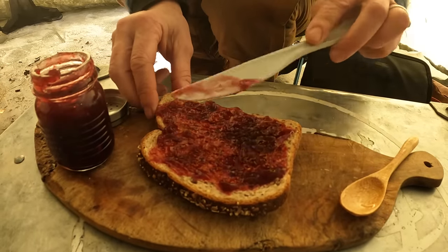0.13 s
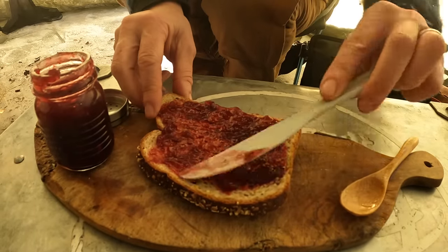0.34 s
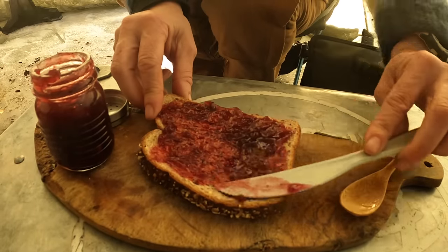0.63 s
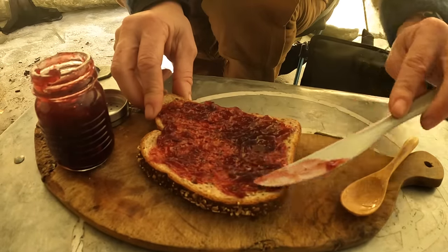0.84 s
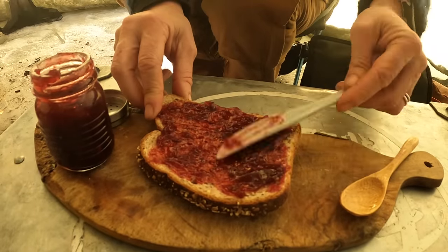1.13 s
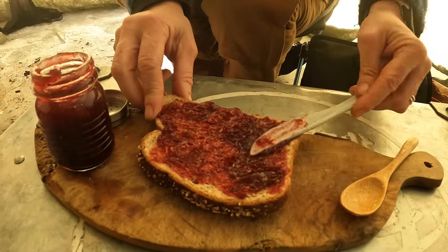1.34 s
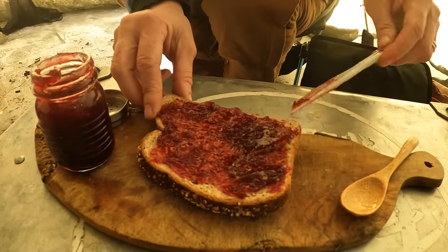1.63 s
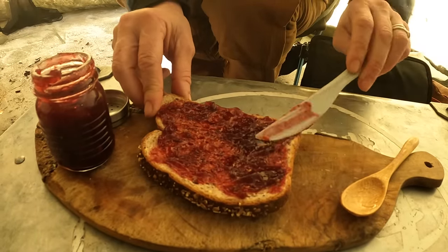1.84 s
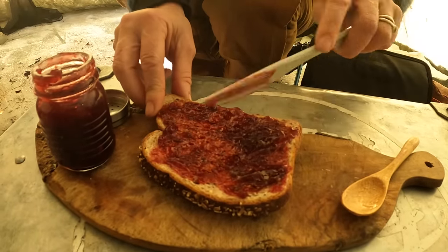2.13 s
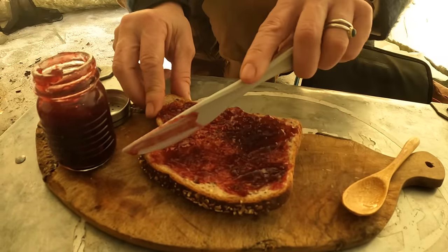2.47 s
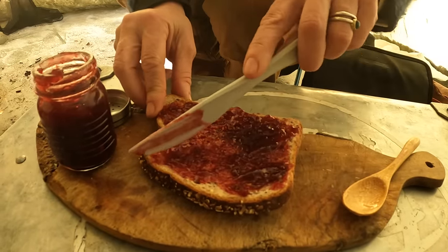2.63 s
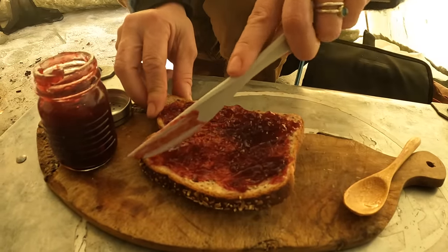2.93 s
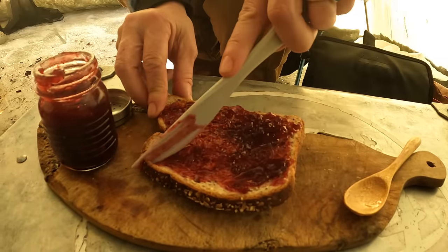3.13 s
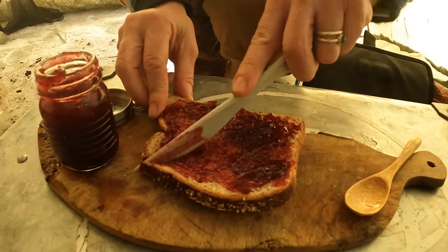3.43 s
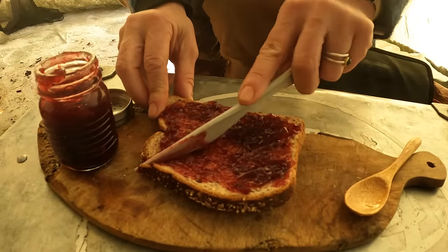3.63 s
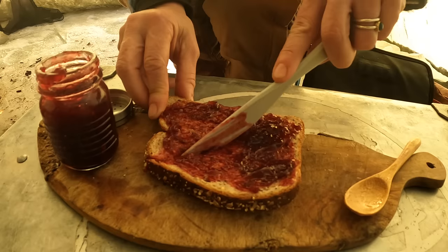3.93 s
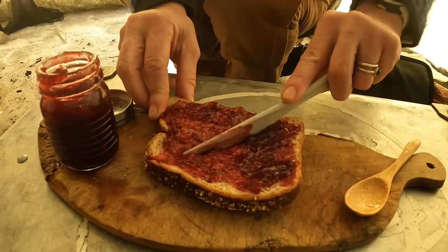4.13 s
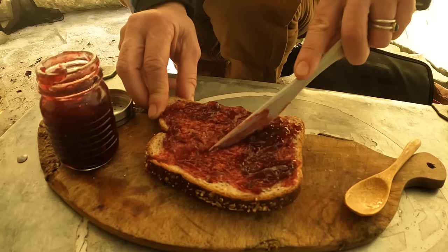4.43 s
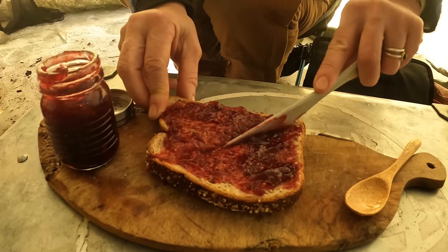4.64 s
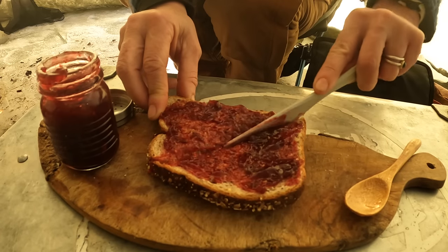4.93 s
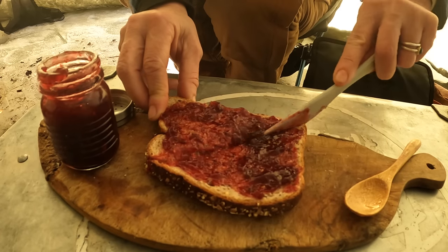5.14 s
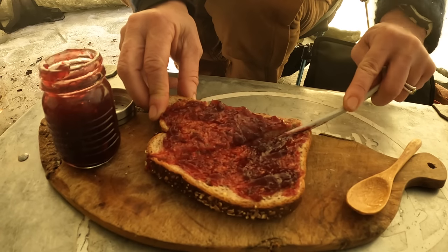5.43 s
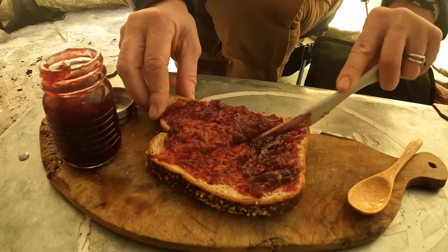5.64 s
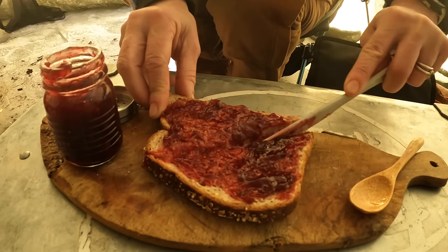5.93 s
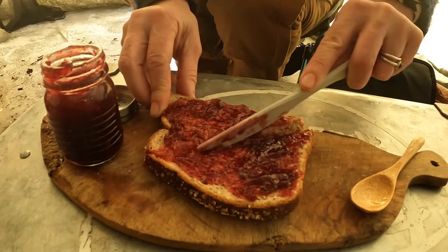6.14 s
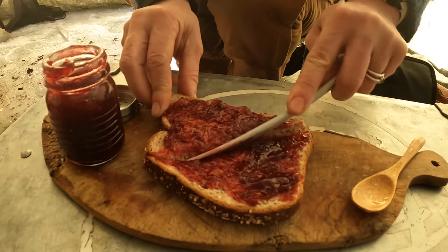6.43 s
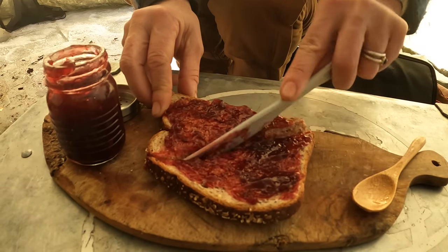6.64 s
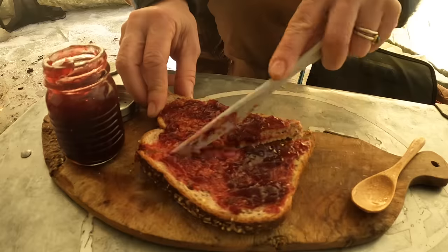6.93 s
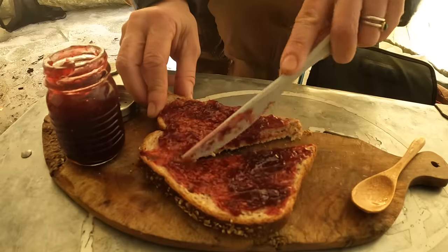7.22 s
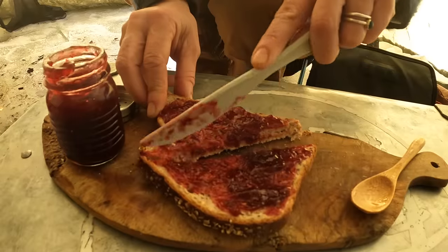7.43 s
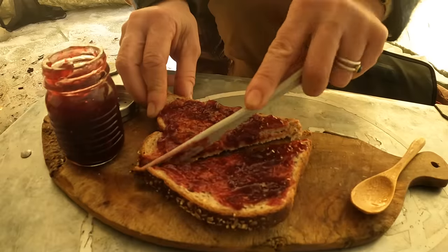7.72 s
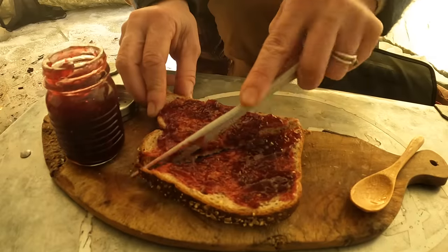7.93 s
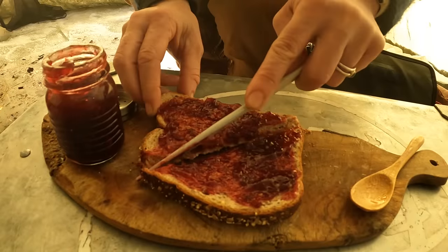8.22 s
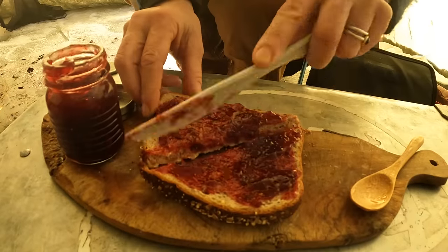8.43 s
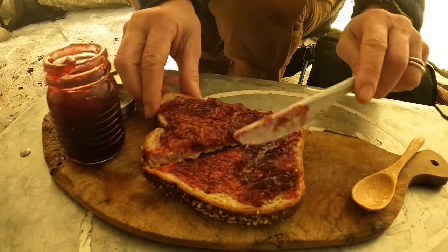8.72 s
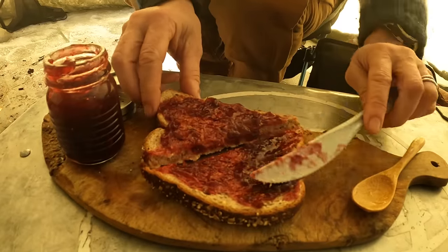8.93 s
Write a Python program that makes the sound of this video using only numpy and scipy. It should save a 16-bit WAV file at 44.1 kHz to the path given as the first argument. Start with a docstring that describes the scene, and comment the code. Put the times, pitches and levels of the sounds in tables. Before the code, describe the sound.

A knife scrapes jam over crisp toast in short, scratchy strokes, with crackling crumbs and soft wooden knocks over a faint hum.

```python
"""Jam on toast in a tent

Close to a small camera's stereo microphone, a knife scrapes jam over crisp toast on a wooden board.
Crumbs of crust break as clumped clicks that ring the blade and shake the board and table; single
crumbs snap and the board knocks. Underneath, a low hum wavers over a soft hiss."""
import sys
import numpy as np
from scipy import signal
from scipy.fft import rfft, irfft
from scipy.io import wavfile
from scipy.ndimage import uniform_filter1d

SR = 44100
rng = np.random.default_rng(int(sys.argv[2]) if len(sys.argv) > 2 else 0)


def dump(signal):
    """Clip the signal to [-1, 1] and save it as 16-bit WAV at the path in sys.argv[1]."""
    limited = np.clip(np.atleast_2d(signal).T, -1, 1)
    pcm = np.round(limited * 32767).astype(np.int16)
    wavfile.write(sys.argv[1], SR, pcm)


N = 400869
SHORT = 2048  # samples in a short ring, or between changes of position


def amp(db):
    return 10 ** (np.asarray(db) / 20)


def unit_rms(x):
    return x / np.sqrt(np.mean(x ** 2) + 1e-20)


def unit_peak(x):
    return x / abs(x).max()


def through(x, taps):
    return signal.oaconvolve(x, taps)[:N]


def over_time(rows):
    return np.interp(np.arange(N) / SR, *np.transpose(rows))


def over_pitch(rows, hz):
    row_hz, value = np.transpose(rows)
    return np.interp(np.log(hz + 1), np.log(row_hz + 1), value)


def wander(size):
    """Random drift, smoothed over `size` samples."""
    return unit_rms(uniform_filter1d(uniform_filter1d(rng.standard_normal(N), size), size))


def colour(spectrum, size=4096):
    """Causal response of energy 1 with the given spectrum."""
    db = over_pitch(spectrum, abs(np.fft.fftfreq(size, 1 / SR)))
    log_gain = np.log(amp(np.maximum(db, -100)))
    taps = np.fft.ifft(np.exp(np.conj(signal.hilbert(log_gain)))).real[:size // 2]
    return taps / np.linalg.norm(taps)


def ring(modes, size=8192):
    """Response of energy 1 of dying modes, cut off an octave below the lowest."""
    t = np.arange(size) / SR
    taps = sum(amp(db) * np.sqrt(width) * np.exp(-np.pi * width * t) * np.sin(2 * np.pi * hz * t)
               for hz, width, db in modes)
    taps = signal.lfilter(*signal.butter(2, 0.5 * modes[0][0], "high", fs=SR), taps)
    return taps / np.linalg.norm(taps)


def detuned(modes, share):
    return [(hz * (1 + share), width, db) for hz, width, db in modes]


def crumbs(per_s, spread_db, clump_db, rub, bite=1):
    """Tiny random breaks of uneven size, coming in clumps over a share of smooth rubbing."""
    clumps = amp(clump_db * bite * wander(300))
    sizes = amp(spread_db * np.minimum(rng.exponential(1, N), 2.8))
    onsets = rng.random(N) < per_s / SR
    decays = signal.lfilter([1], [1, -np.exp(-1 / (0.00038 * SR))], sizes * onsets)
    breaks = bite * unit_rms(decays * rng.standard_normal(N))
    return clumps * (breaks + rub * rng.standard_normal(N)) / np.hypot(bite, rub)


# Faint hiss and rubbing between scrapes. Each row: time in seconds, level in dB.
PAUSE_FLOOR = [(0.0, -78), (2.3, -76), (3.1, -67), (4.28, -74.5), (5.0, -59), (5.95, -69), (6.12, -74),
               (6.3, -74.5), (7.2, -70), (7.38, -75.5), (7.6, -70.5), (9.09, -68.5)]
# Scrapes, close to the microphone. Each row: start and length in seconds, firmest point from 0 to 1,
# crackle in dB, drag in dB above the crackle, shaking of the board in dB.
SCRAPES = [(0.0, 0.096, 0.25, -61, 1.5, -58.5), (0.231, 0.068, 0.37, -59, -10, -75.5),
           (0.363, 0.048, 0.3, -53, -9.5, -56), (0.418, 0.21, 0.4, -62, -7, -53.5),
           (0.535, 0.27, 0.35, -49.5, -1, -44.5), (1.334, 0.18, 0.64, -71, 12.5, -52),
           (1.483, 0.075, 0.14, -61.5, 11.5, -54), (1.529, 0.14, 0.42, -69.5, 11, -50.5),
           (1.79, 0.082, 0.14, -53.5, -1, -38.5), (1.858, 0.15, 0.62, -59, 7, -52.5),
           (2.235, 0.067, 0.45, -66, -4, -71), (2.37, 0.062, 0.15, -70.5, 9.5, -43),
           (2.481, 0.089, 0.21, -47.5, -10, -48), (2.662, 0.03, 0.45, -44.5, -3, -42),
           (2.729, 0.13, 0.87, -52.5, -6, -46.5), (2.877, 0.072, 0.66, -52.5, -13, -52),
           (2.978, 0.15, 0.35, -39, -15, -39.5), (3.094, 0.15, 0.48, -55, -24, -56.5),
           (3.187, 0.075, 0.42, -45.5, -15, -51.5), (3.21, 0.55, 0.3, -52, -17, -57.5),
           (3.692, 0.24, 0.26, -43.5, -4.5, -40), (3.78, 0.18, 0.67, -51, 8, -40),
           (3.944, 0.1, 0.8, -57.5, 2.5, -62), (4.034, 0.22, 0.78, -49, -8, -52),
           (4.308, 0.45, 0.19, -54.5, -3, -53), (4.537, 0.032, 0.6, -47.5, -2.5, -49),
           (4.587, 0.25, 0.37, -46, 2, -52), (4.667, 0.18, 0.62, -37, 1.5, -34),
           (4.881, 0.098, 1, -62.5, 7, -46), (5.083, 0.31, 0.14, -58, 1, -50),
           (5.219, 0.23, 0.02, -43, 7.5, -41.5), (5.435, 0.093, 0.35, -55, 6, -74),
           (5.513, 0.1, 0.16, -70, 12.5, -35.5), (5.689, 0.075, 0.92, -47, 6.5, -47),
           (5.758, 0.11, 0.47, -54, 10.5, -40), (5.911, 0.12, 0, -48.5, -2, -39),
           (6.184, 0.19, 0.55, -54, 1, -49.5), (6.37, 0.31, 0.3, -55, -2.5, -54),
           (6.699, 0.14, 0.58, -48, -3, -44), (6.857, 0.16, 0.78, -53, -1.5, -41),
           (6.996, 0.25, 0.22, -63, -2, -56), (7.123, 0.1, 0.35, -50.5, 0, -54),
           (7.511, 0.11, 0.82, -57, -15, -64), (7.585, 0.16, 0.49, -52, -2, -50),
           (7.698, 0.18, 0.47, -46, -1, -49), (7.781, 0.12, 0.6, -46.5, -0.5, -43.5),
           (7.87, 0.2, 0.2, -62.5, -1, -46), (8.029, 0.16, 0.69, -60, -0.5, -49.5),
           (8.652, 0.12, 0.4, -61, -8, -72)]


def knife_contact():
    """Amplitudes of crackle, drag, wet smear and shaking: a scrape swells, then eases off."""
    floor_db = over_time(PAUSE_FLOOR)
    power = amp([floor_db, floor_db - 2, floor_db - 12, floor_db + 1.3]) ** 2
    for start, length, firmest, db, drag_db, shake_db in SCRAPES:
        t = np.arange(0, length, 1 / SR)
        firmest_s = np.clip(firmest, .05, .95) * length
        eased = np.interp(t, [0, firmest_s, length], [1, 0, 1]) ** 1.23  # a slightly rounded swell
        touch = np.clip(np.minimum(t, length - t) / 0.012, 0, 1)  # touch-down and lift-off
        soaked = np.clip((drag_db - 8.5) / 4, .12, 3.1)  # the dullest scrapes push thick jam
        crackle = amp(db - 18.5 * eased)
        drag = crackle * amp(drag_db)
        layers = np.array([crackle, drag, drag * soaked, amp(shake_db - 15 * eased)])
        at = round(start * SR)
        power[:, at:at + len(t)] += (touch * layers) ** 2
    return np.sqrt(power)


# Spells of loose grip. Each row: start and length in seconds, opening ring in dB above the drag.
LOOSE_GRIP = [(4.705, 0.16, 15), (5.207, 0.29, 22), (5.724, 0.13, 13.5)]
# The dragging blade, heard close. Each row: frequency in Hz, relative level in dB.
DRAG_SPECTRUM = [(250, -31.5), (500, -21), (950, -6), (1250, -1), (1480, 3.5), (1750, -2), (2200, -5),
                 (3500, -10), (7000, -37.5)]
# The ring of the blade. Each row: frequency in Hz, width in Hz, relative level in dB.
BLADE_MODES = [(2174, 114, 12.5), (3950, 360, 8.5)]


def blade(drag):
    """A loose grip turns drag into ring, which fades as the grip tightens again."""
    free = np.full(N, amp(-36.5))  # firmly held
    for start, length, db in LOOSE_GRIP:
        size = round(length * SR)
        spell = amp(db + np.linspace(0, -8.0, size)) * signal.windows.tukey(size, .4)
        free[round(start * SR):][:size] += spell
    held = drag / np.hypot(1, free)
    return through(held, colour(DRAG_SPECTRUM)) + through(free * held, ring(BLADE_MODES))


# A pocket of air under the blade, in the thickest jam. Each row: time in seconds, base pitch in Hz.
AIR_POCKET = [(1.4, 970), (1.6, 1290)]


def squelch(smear, width_hz=220):
    """The smear sounds the shrinking pocket: a rising resonance with a throaty one below it."""
    out, pole = 0, np.exp(-np.pi * width_hz / SR)
    for pitch_ratio, db in ((0.97, 6), (0.4, 0.67)):
        turn = np.exp(2j * np.pi * np.cumsum(pitch_ratio * over_time(AIR_POCKET)) / SR)
        resonance = (turn * signal.lfilter([1 - pole], [1, -pole], smear / turn)).real
        out = out + amp(db) * np.sqrt(2 / (1 - pole)) * resonance
    return out


# The board's hollow upper ring. Each row: frequency in Hz, width in Hz, relative level in dB.
WOOD_MODES = [(315, 15, 8), (526, 120, 2), (777, 42, -3.5), (1030, 700, 7)]


def wood(smear, crackle, grain):
    """Smearing presses the toast on the wood and rings it; firm pressure brings out one mode."""
    pressure = amp(-1.0) * crackle * np.minimum(crackle / amp(-32.5), 1)
    return through(smear, ring(WOOD_MODES)) + through(pressure * grain, ring(WOOD_MODES[2:3]))


# Low modes of the table (first two rows) and the board on it.
# Each row: frequency in Hz, width in Hz, relative level in dB.
LOW_MODES = [(51, 6.7, -1), (95, 10.4, 0), (131.5, 6.5, 9), (155.3, 12, 7.5), (187.5, 21, 9),
             (246.5, 12.8, 0.5), (324.5, 11, -2.5), (404, 31, -8)]


def board_rumble(shake):
    """The uneven push of the knife shakes board and table."""
    push = shake * crumbs(per_s=200, spread_db=2.5, clump_db=2.0, rub=0.76)
    return through(push, ring(LOW_MODES))


# The ring of the crisp slice. Each row: frequency in Hz, width in Hz, relative level in dB.
TOAST_MODES = [(1598, 220, 4), (2860, 510, 3), (4010, 150, 0.5)]


def toast(crackle, scatter=0.087):
    """Breaks ring the slice from five places of different pitch, moving some twenty times a second."""
    breaks = crackle * crumbs(per_s=400, spread_db=5.0, clump_db=5.0, rub=0.27)
    place = np.repeat(rng.integers(0, 5, N // SHORT + 1), SHORT)[:N]
    rings = [ring(detuned(TOAST_MODES, scatter * (k / 2 - 1)), SHORT) for k in range(5)]
    return sum(through(breaks * (place == k), taps) for k, taps in enumerate(rings))


# Breaking crust, heard close. Each row: frequency in Hz, relative level in dB.
CRUST_SPECTRUM = [(1200, -74), (2200, -14.5), (3300, -6.5), (4150, -3.5), (5250, -11), (6250, -2),
                  (8200, -2.5), (11000, -18.5), (12300, -19.5), (16000, -46)]


def scraping():
    """The knife breaks crust and smears jam, sounding blade, wood, board and slice."""
    crackle, drag, wet, shake = knife_contact()
    bite = np.clip((crackle / amp(-57.5)) ** 0.5, .1, 1)  # a light touch rubs, a firm one breaks crumbs
    bite *= np.clip((amp(-44.5) / crackle) ** 0.6, .35, 1)  # the firmest merges them into a rasp
    fine = crumbs(per_s=700, spread_db=8.5, clump_db=2.5, rub=0.64, bite=bite)
    coarse = 0.22 * fine + 0.84 * crumbs(per_s=600, spread_db=2.0, clump_db=4.0, rub=0.42, bite=bite)
    smear = wet * crumbs(per_s=720, spread_db=5.0, clump_db=4.5, rub=1.0)
    crust = through(crackle * fine, colour(CRUST_SPECTRUM))
    return (crust + blade(drag * coarse) + squelch(smear) + wood(smear, crackle, coarse)
            + board_rumble(shake) + toast(amp(-7.0) * bite * crackle))


# The hum, in the middle of the stereo image. Each row: time in seconds, level in dB.
HUM_LEVELS = [(0.0, -50.5), (0.81, -46.5), (1.15, -53.5), (1.4, -63), (1.6, -93), (1.82, -63), (2.81, -45),
              (3.88, -45), (4.35, -59.5), (4.89, -42), (5.06, -95), (5.22, -49), (5.95, -58), (6.1, -90),
              (6.25, -46.5), (6.96, -65), (7.44, -83), (7.65, -54.5), (8.6, -57), (9.09, -58)]


def hum(pitch_hz=65.8, waver_hz=1.77, waver_db=2.66):
    """A low tone with a weak octave swells, fades and wavers."""
    waver = wander(3000)
    phase = 2 * np.pi * np.cumsum(pitch_hz + waver_hz * waver[::-1]) / SR
    level = amp(over_time(HUM_LEVELS) + waver_db * waver)
    return np.sqrt(2) * level * (np.sin(phase) + amp(-19.0) * np.sin(2 * phase))


# The steady background at the microphone. Each row: frequency in Hz, relative level in dB.
HISS_SPECTRUM = [(12, -61), (20, 1), (70, -11), (134, -14), (660, -30.5), (5200, -48), (7110, -40.5),
                 (10000, -62), (12200, -50.5), (16000, -66)]


def hiss():
    """Soft noise, heaviest in the bass, independent for mid and side."""
    taps = colour(HISS_SPECTRUM, size=16384)
    return [amp(-61) * through(noise, taps) for noise in rng.standard_normal((2, N))]


# Single crumbs, close to the microphone.
# Each row: start in seconds, level in dB, dull part in dB above the bright part.
CRUMB_SNAPS = [(0.476, -32, -17), (0.501, -32.5, -41), (0.9, -45.5, 9), (1.284, -45.5, 0),
               (1.3337, -44, -7), (1.638, -51, 7), (1.7972, -53, 18.5), (1.8128, -40, 14),
               (1.8386, -42, -25), (2.381, -51, 1), (2.4867, -46, 1), (2.396, -46.5, 4),
               (2.814, -25.5, -15), (2.916, -21.5, -9), (2.9706, -34, -14), (2.9912, -15.5, -5),
               (3.0015, -18.5, -12), (3.046, -20, -27), (3.0695, -29, -1), (3.076, -17, -21),
               (3.1264, -33, -34), (3.143, -26.5, -35), (3.1549, -22.5, -19), (3.161, -27.5, -6.5),
               (3.228, -33.5, -34), (3.2918, -32.5, -28), (3.3336, -31.5, -32), (3.5453, -35, -33),
               (3.8313, -54, 2), (3.8457, -43, 17), (3.918, -35, 6), (3.9648, -31, -30), (4.16, -43, -21),
               (4.179, -31.5, -18), (4.201, -42, 6), (4.6049, -30, 2), (4.8124, -36, -29),
               (5.378, -31.5, -16), (5.47, -46.5, 15), (5.741, -27.5, 3), (5.934, -37, 10),
               (6.2588, -35.5, -28), (6.4895, -32, -3), (6.5074, -46, 9), (6.551, -37.5, -13),
               (6.886, -50, -11), (6.9875, -54, -16), (7.232, -34.5, -4), (7.612, -22.5, -13),
               (7.642, -33, -27), (7.744, -27, -5), (7.765, -40, -3), (7.789, -39, 3), (8.118, -38, -15),
               (8.145, -36.5, -24), (8.2537, -41, -3)]


def snaps():
    """A crumb builds for half a millisecond, clicks and splinters, each at its own pitch."""
    bright, out, t = np.zeros(N), np.zeros(N), np.arange(400) / SR
    drag, wood_ring = colour(DRAG_SPECTRUM), ring(WOOD_MODES, SHORT)
    noises = rng.standard_normal((len(CRUMB_SNAPS), len(t)))
    detunings = 0.174 * rng.uniform(-1.4, 1, len(CRUMB_SNAPS))
    for (start, db, dull_db), noise, detune in zip(CRUMB_SNAPS, noises, detunings):
        burst = 0.3 * noise * amp(-60 * t / 0.0074) * np.minimum(t / 0.00021, 1)
        body = drag + 0.08 * ring(detuned(TOAST_MODES, detune), SHORT) + 0.26 * wood_ring
        dull = signal.oaconvolve(burst, unit_peak(body))
        burst[20] = 1  # the click, in the bright part only
        at = round(start * SR)
        out[at:at + len(dull)] += amp(db + dull_db) * dull
        bright[at:at + len(t)] += amp(db) * burst
    return out + through(bright, unit_peak(colour(CRUST_SPECTRUM)))


# The board knocking on the table, close by.
# Each row: start in seconds, level in dB, hardness as dB of the wood ring above the low ring.
BOARD_KNOCKS = [(0.639, -32.5, -8), (0.904, -31.5, -9.5), (1.196, -42.5, -11), (1.805, -27.5, -23),
                (1.957, -38.5, -13), (2.391, -46, 5), (2.513, -38, -6), (2.67, -41, -23), (2.917, -42.5, 9),
                (2.993, -32.5, 7), (3.704, -51.5, -41), (4.417, -40, -39), (5.073, -37.5, -11),
                (5.169, -27, -11.5), (5.522, -30, -0.5), (5.672, -32.5, -12), (5.824, -32.5, 0.5),
                (6.265, -42, -25), (6.773, -32.5, -20), (6.931, -37, -14), (7.981, -33, -19)]


def knocks():
    """A rounded, chattering blow rings board and table; its harder edge rings the wood."""
    out, t = np.zeros(N), np.arange(1000) / SR
    table_ring, wood_ring = ring(LOW_MODES[:2]), ring(WOOD_MODES)
    chatters = rng.standard_normal((len(BOARD_KNOCKS), len(t)))
    detunings = 0.092 * rng.uniform(-0.71, 1, len(BOARD_KNOCKS))  # each place has its own pitch
    for (start, db, hard_db), chatter, detune in zip(BOARD_KNOCKS, chatters, detunings):
        blow = t / 0.00063 * np.exp(-t / 0.00045) + 0.26 * chatter * np.exp(-t / 0.01)
        edge = chatter * np.exp(-t / 0.0034)
        thud_db = -15.5 - 0.51 * hard_db  # softer knocks thud the table more
        knock = unit_peak(signal.oaconvolve(blow, ring(detuned(LOW_MODES[2:], detune))))
        knock += amp(hard_db) * unit_peak(signal.oaconvolve(edge, wood_ring))
        knock += amp(thud_db) * unit_peak(signal.oaconvolve(blow, table_ring))
        span = out[round(start * SR):][:len(knock)]
        span += amp(db) * knock[:len(span)]
    return out


def tent(x, decay_s=0.036):
    """Sparse mid and side reflections off table, hands and cloth; the side shifts as hands move."""
    t = np.arange(SHORT) / SR
    taps = rng.choice([-1, 1], (5, SHORT)) * (rng.random((5, SHORT)) < .06)
    taps = taps * amp(-60 * t / decay_s) * (t > .0008)
    taps /= np.linalg.norm(taps, axis=1, keepdims=True)
    pose = np.repeat(rng.integers(1, 5, N // SHORT + 1), SHORT)[:N]
    return through(x, taps[0]), sum(through(x * (pose == k), taps[k]) for k in range(1, 5))


# Stereo width at the microphone. Each row: frequency in Hz, gain of the side signal in dB.
SIDE_GAIN = [(30, -21.5), (70, -24.5), (600, -14), (1000, -9), (8000, -11), (13000, -4)]
# Balance at the microphone. Each row: frequency in Hz, left over right in dB.
BALANCE = [(100, -0.35), (500, -1), (8000, 0.54), (13000, 4)]


def scene():
    """Knife and board close and central, with reflections and hiss spread around them."""
    near = scraping() + snaps() + knocks()
    tent_mid, tent_side = tent(near)
    hiss_mid, hiss_side = hiss()
    hz = np.fft.rfftfreq(N, 1 / SR)
    mid = rfft(near + amp(-9.0) * tent_mid + hum() + hiss_mid)
    side = rfft(tent_side + amp(10.0) * hiss_side) * amp(over_pitch(SIDE_GAIN, hz))
    lean = amp(over_pitch(BALANCE, hz) / 2)
    return irfft(np.array([(mid + side) * lean, (mid - side) / lean]), N)


def record(dry):
    """The microphone housing colours a narrow band, then the recorder cuts the highest treble."""
    lift_db, lift_hz, width_hz, cutoff_hz = 1.5, 5200, 273, 15800
    hz = np.fft.rfftfreq(N, 1 / SR)
    housed = irfft(rfft(dry) * amp(lift_db * np.exp(-((hz - lift_hz) / width_hz) ** 2)), N)
    lowpass = signal.firwin(511, cutoff_hz, window=("kaiser", 9), fs=SR)
    return signal.oaconvolve(housed, lowpass[None], "same")


dry = scene()
out = record(dry)
dump(out)
```